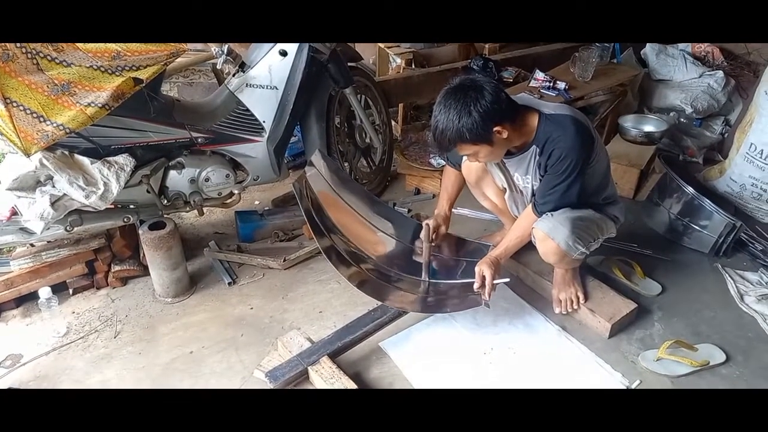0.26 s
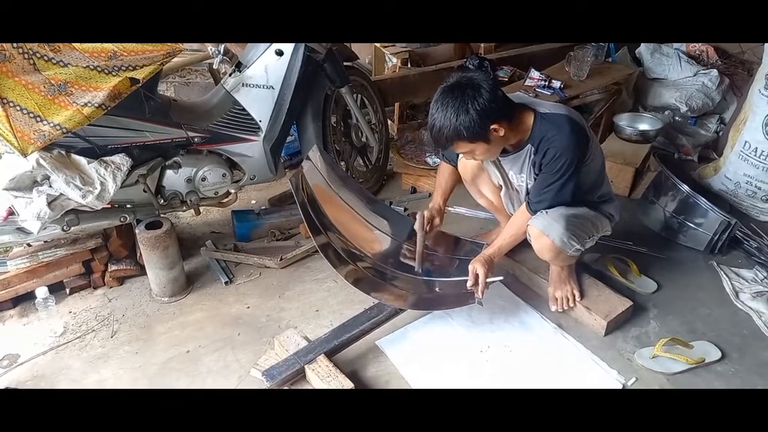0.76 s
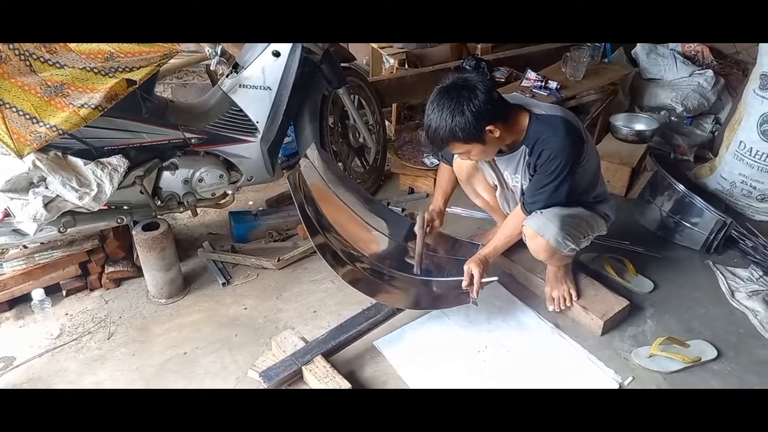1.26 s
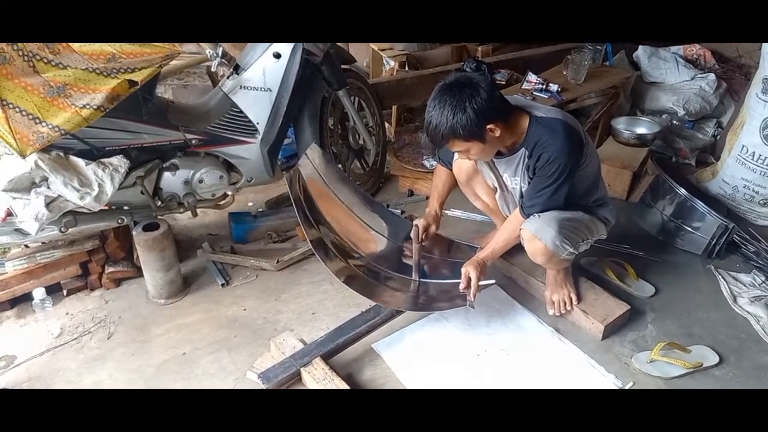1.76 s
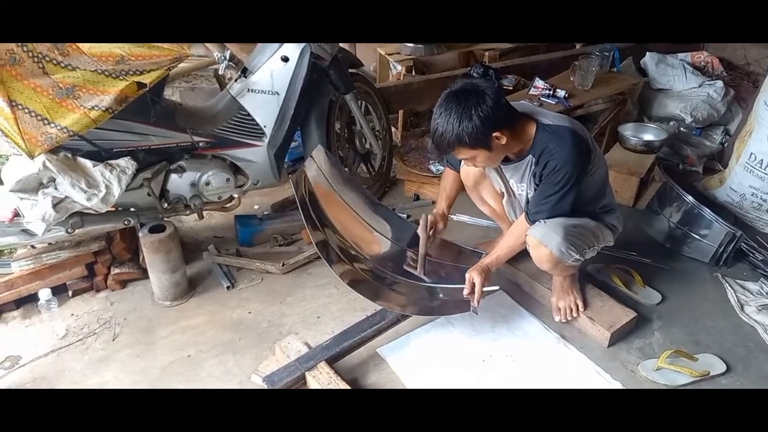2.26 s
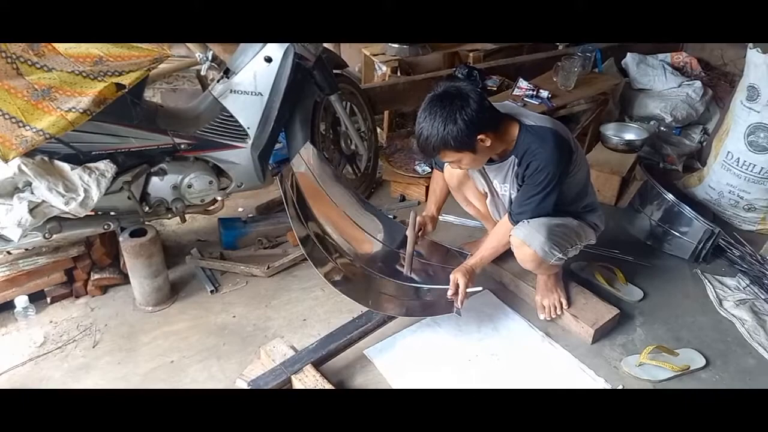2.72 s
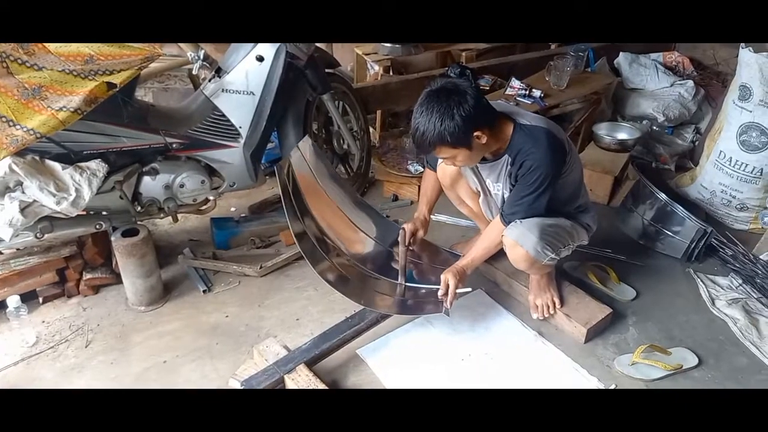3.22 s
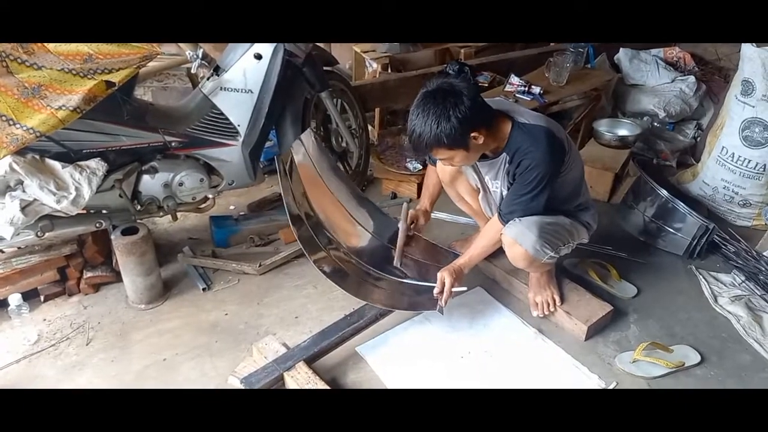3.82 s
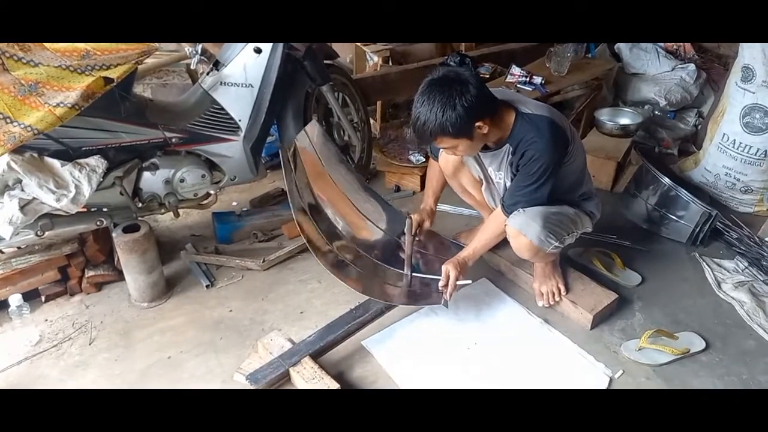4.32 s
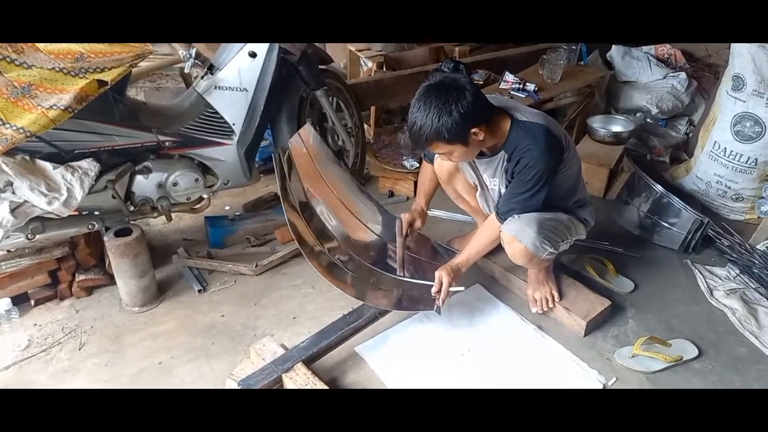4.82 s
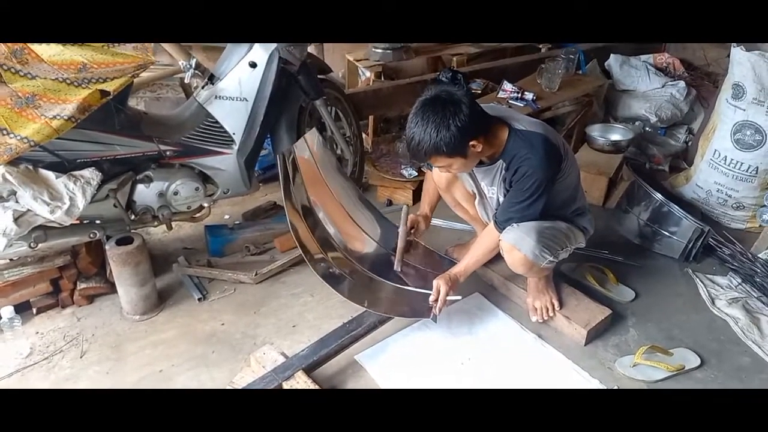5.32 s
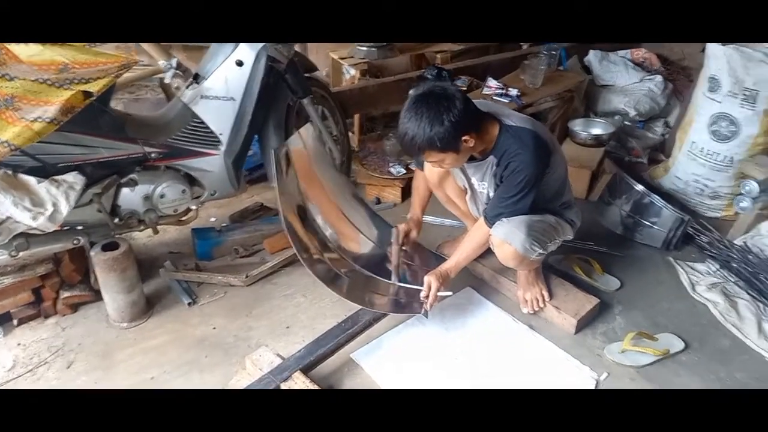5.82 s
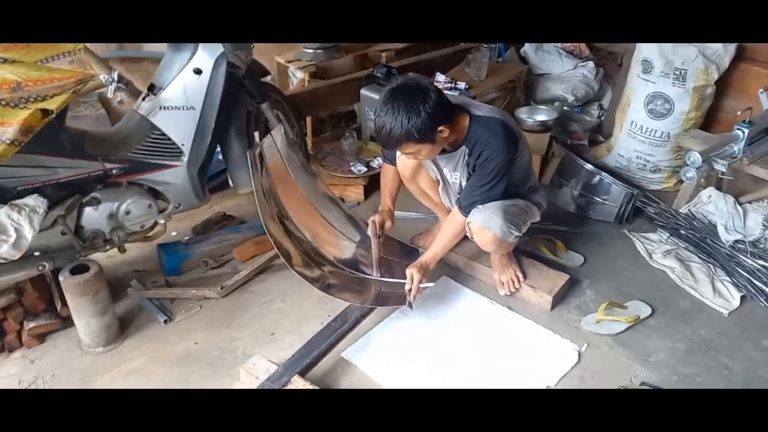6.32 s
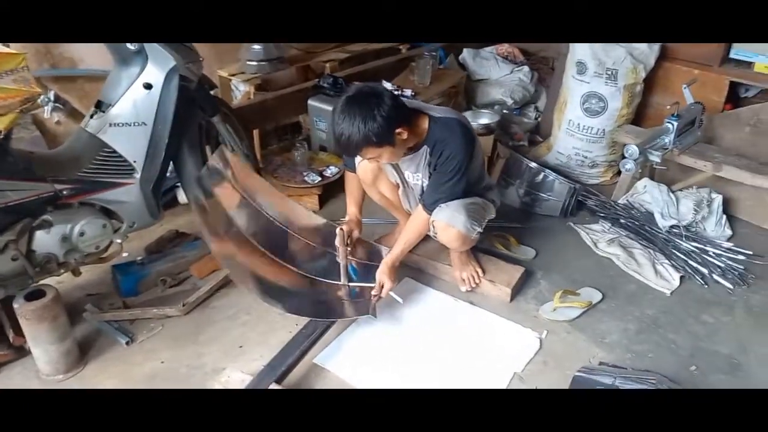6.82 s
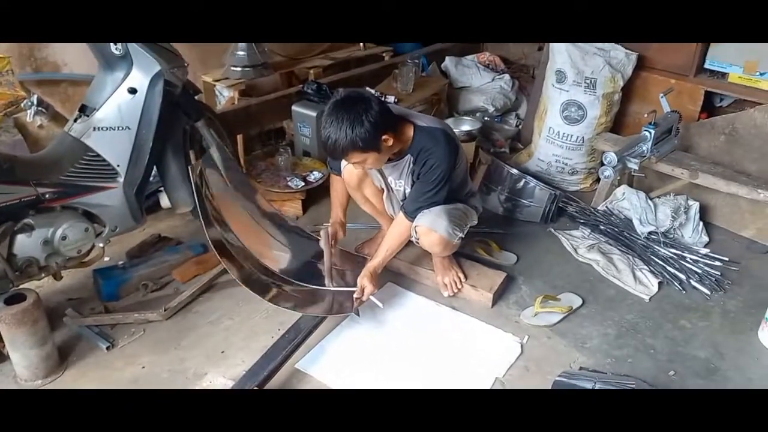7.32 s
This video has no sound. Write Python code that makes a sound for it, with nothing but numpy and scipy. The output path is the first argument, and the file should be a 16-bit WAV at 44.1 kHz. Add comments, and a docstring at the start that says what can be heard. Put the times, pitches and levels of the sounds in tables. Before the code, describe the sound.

Steady close hammering on a metal chisel over a curved steel sheet, each strike a thump and short clang, in a quiet workshop.

```python
"""The scene opens in the ring of a hammer blow: a chisel taps along a curved steel sheet on timber in a workshop.
Steady blows follow; each thumps the low modes, sets a dense clang going and rings chisel and hammer, all dying sines
and shaped noise, and the colour drifts as the chisel walks on. Room tone lies behind; thin whistles, swells of hiss,
a brief hum and a low rumble, made of noise bands and one sine, come and go.
After a pause with light ticks and scrapes, the chisel is set down for one last blow."""
import sys
import numpy as np
from scipy import signal
from scipy.fft import irfft, next_fast_len
from scipy.io import wavfile

SR = 44100
rng = np.random.default_rng(int(sys.argv[2]) if len(sys.argv) > 2 else 0)


def transcribe(signal):
    """Save signal, clipped to [-1, 1], as a 16-bit WAV file at the path in sys.argv[1]."""
    frames = np.atleast_2d(signal).T
    limited = np.clip(frames, -1, 1)
    pcm = np.round(limited * 32767).astype(np.int16)
    wavfile.write(sys.argv[1], SR, pcm)


N = 333837
LENGTH = 32768  # longest single sound, in samples
T = np.arange(LENGTH) / SR
BINS = np.fft.rfftfreq(512, 1 / SR)  # bands of the clang, Hz
AGE = np.arange(LENGTH // 128 + 1) * 128 / SR  # frames of the clang, s after the blow


def amp(db):
    """Decibels to gain."""
    return 10 ** (np.asarray(db) / 20)


def evened(x):
    """Scales to rms 1."""
    return x / np.sqrt(np.mean(x ** 2) + 1e-20)


def read(points, hz):
    """Reads a spectrum table on a log-frequency axis."""
    f, value = np.transpose(points)
    return np.interp(np.log(hz + 1), np.log(f + 1), value)


def add(mix, s, sound):
    """Mixes a stereo sound in at time s, which may lie before the start."""
    at = round(s * SR)
    sound = sound[:, max(-at, 0):]
    part = mix[:, max(at, 0):][:, :sound.shape[1]]
    part += sound[:, :part.shape[1]]


def ears(lean_db):
    """Left and right gains for a level difference."""
    return amp(np.array([lean_db, -lean_db]) / 2)


def decay(age, t60):
    """Exponential fade that has fallen by 60 dB after t60 seconds."""
    return np.exp(-np.log(1000) * age / t60)


def onset(rise):
    """Soft start with the given time constant in seconds."""
    return 1 - np.exp(-T / rise)


def swell(start, rise, hold, t60, db):
    """Gain over the whole scene of a sound that rises, holds and dies away."""
    age = np.arange(N) / SR - start
    attack = np.sin(np.pi / 2 * np.clip(age / rise, 0, 1)) ** 2
    return amp(db) * attack * decay(np.maximum(age - rise - hold, 0), t60)


# how alike the two sides are: f/Hz, left-right correlation [-1 to 1]
LIKENESS = [(50, 0.57), (200, 0.96), (400, 0.82), (750, 0.44), (1400, 0.29), (2600, 0.076), (5000, 0.13),
            (12000, 0)]


def chance(hz, count=1):
    """Random spectra (2, count, bins): alike left and right in the low mids, almost unrelated in the treble."""
    real = rng.standard_normal((2, count, len(hz)))
    a, b = real + 1j * rng.standard_normal((2, count, len(hz)))
    same = np.clip(read(LIKENESS, hz), -1, 1)
    return np.array([a, same * a + np.sqrt(1 - same ** 2) * b])


def noise(tone, size):
    """Steady stereo noise of rms 1 with the given spectrum."""
    hz = np.fft.rfftfreq(size, 1 / SR)
    return evened(irfft(chance(hz)[:, 0] * amp(read(tone, hz)), size))


# spectrum of the still air in the workshop: f/Hz, relative level per Hz/dB
ROOM_TONE = [(20, -23), (50, -5), (100, -2.5), (250, -7), (400, -6.5), (800, -17.5), (1600, -20.5),
             (3000, -22.5), (5000, -32.5), (15000, -35.5)]


def room_tone(level_db=-58.5):
    """Still air in the workshop: steady noise, strongest in the bass."""
    return amp(level_db) * noise(ROOM_TONE, next_fast_len(N))[:, :N]


# one low swell: start t/s, rise/s, hold/s, release t60/s, level/dB
RUMBLE_SWELL = (2, 0.6, 1.5, 4.5, -59)
# its spectrum, peaked in the deep bass: f/Hz, relative level per Hz/dB
RUMBLE_TONE = [(20, -22), (42, -18.5), (49, -4), (57, -17), (80, -20), (160, -21.5), (400, -48.5),
               (2000, -75)]


def rumble():
    """A low drone like a far engine: a narrow hump of bass noise that swells for a while."""
    return swell(*RUMBLE_SWELL) * noise(RUMBLE_TONE, next_fast_len(N))[:, :N]


# swells of hiss, a row each: start t/s, rise/s, hold/s, release t60/s, level/dB
HISS_SWELLS = [(1.15, 0.064, 0.35, 5.5, -54), (4.257, 0.057, 0.054, 0.44, -51),
               (5.352, 0.033, 0.005, 0.2, -50.5)]
# their spectrum: f/Hz, relative level per Hz/dB
HISS_TONE = [(1500, 2.5), (4000, -1), (7000, -9), (8600, -4), (10000, -11.5), (15000, -11.5)]


def hiss():
    """A faint hiss comes and goes: one treble noise under overlapping swells."""
    gain = sum(swell(*row) for row in HISS_SWELLS)
    return gain * noise(HISS_TONE, next_fast_len(N))[:, :N]


# one short swell: start t/s, rise/s, hold/s, release t60/s, level/dB
HUM_SWELL = (1.9, 0.1, 0.2, 0.5, -45)


def hum(pitch_hz=132):
    """A brief low hum: one sine, the same on both sides."""
    return swell(*HUM_SWELL) * np.sin(2 * np.pi * pitch_hz * np.arange(N) / SR)


# thin far whistles, like a small bird: t/s, length/s, f/Hz, level/dB
WHISTLES = [(.5, 0.13, 4300, -75), (2.75, 0.12, 4480, -69), (7.218, 0.14, 4520, -79),
            (7.25, 0.12, 3450, -73)]


def whistles(width_hz=45):
    """Thin notes from outside, blurred by distance: narrow noise bands that fade in and out."""
    out = np.zeros((2, N))
    for s, length, hz, db in WHISTLES:
        size = 2 * round(length * SR / 2)
        line = [(hz - 3 * width_hz, -100), (hz - width_hz, -6), (hz, 0),
                (hz + width_hz, -6), (hz + 3 * width_hz, -100)]
        note = noise(line, LENGTH)[:, :size] * np.sqrt(2 * np.hanning(size))
        add(out, s, amp(db) * note)
    return out


# the chisel touches the sheet lightly: t/s, level/dB, length of the contact as t60/s
TOUCHES = [(6.963, -58, 0.14), (7.028, -56.5, 0.12), (7.406, -47, 0.006), (7.4257, -38, 0.0049),
           (7.4305, -43, 0.008)]
# spectrum of a touch: f/Hz, relative level per Hz/dB
TOUCH_TONE = [(100, -14.5), (400, -29), (2000, -1), (4200, 2), (6000, -10), (15000, -11)]


def touches(echo_db=-21, echo_t60=0.17):
    """Ticks and scrapes as the chisel is lifted and set down: fading noise with a faint tail from the room."""
    out = np.zeros((2, N))
    for s, db, t60 in TOUCHES:
        fade = decay(T, t60) + amp(echo_db) * decay(T, echo_t60)
        add(out, s, amp(db) * noise(TOUCH_TONE, LENGTH) * fade)
    return out


def ring(gains, hz, t60):
    """A sum of dying sines; gains holds a complex size for each side and mode."""
    pole = (2j * np.pi * hz - np.log(1000) / t60)[:, None]
    # coarse steps times fine steps give every sample
    coarse, fine = np.exp(pole * T[::128]), np.exp(pole * T[:128])
    return ((gains[:, None] * coarse.T) @ fine).imag.reshape(2, -1)


def modes(table, colour, hold=1, scatter=0.24, rise=0.003, bend=0.0033):
    """Separate modes with scattered starting phases; the pressure of the hand bends each pitch a little."""
    hz, db, t60, lean_db = np.transpose(table)
    phase, pressure = rng.standard_normal((2, len(hz)))
    gains = ears(lean_db) * amp(db + read(colour, hz)) * np.exp(1j * scatter * phase)
    return ring(gains, hz * (1 + bend * pressure), t60 * hold) * onset(rise)


# the colour drifts with the chisel: f/Hz, level gained from first place to last/dB, extra level midway/dB
WALK = [(160, 4, -2.5), (240, 5.5, -1.5), (400, -1, -0.5), (605, -0.5, 0.5), (847, 3.5, 3.5),
        (1200, 2.5, 0), (2200, 1, 0.5), (3000, 0, -0.5), (7000, 1.5, 0), (13000, 3, -0.5)]


def blow_colour(place, seating_db, hardness_db, knock_hz=428, knock_octaves=0.55, hard_hz=4000):
    """Spectrum of a blow: place tilts it, firm seating knocks around one pitch, hard contact lifts the treble."""
    hz = BINS[1:]
    midway = 1 / 3 - 4 * place ** 2
    walk = read([(f, place * gained_db + midway * extra_db) for f, gained_db, extra_db in WALK], hz)
    knock = np.exp(-.5 * (np.log2(hz / knock_hz) / knock_octaves) ** 2)
    treble = hz ** 4 / (hz ** 4 + hard_hz ** 4)
    return np.transpose([hz, walk + seating_db * knock + hardness_db * treble])


# spectrum of the crowded higher modes: f/Hz, relative level per Hz/dB
CLANG_TONE = [(40, -45.5), (130, -29), (250, -10), (450, 6), (660, -1), (900, 3.5), (1500, 3), (1950, 7.5),
              (2650, 4), (3050, -5.5), (3700, -12.5), (5500, -20.5), (8600, -19.5), (15000, -22)]
# their ring before the seating damps it: f/Hz, nominal t60/s
CLANG_RING = [(60, 0.84), (300, 0.72), (1200, 0.62), (2200, 0.52), (3200, 0.47), (5000, 0.41), (8000, 0.31),
              (15000, 0.32)]
# their balance: f/Hz, left-right level/dB
CLANG_LEAN = [(200, 1.5), (800, -1), (1100, -3.5), (1700, -4), (2600, -6.5), (3500, -3), (6000, -2),
              (8600, 4.5), (11500, -2), (15000, -3.5)]


def clang(field, colour, hold, early_db=3, early_share=0.66, crack_db=5, crack_s=0.0016, rise=0.001):
    """The sheet's crowded modes: a crack, a quick first fall, then a longer ring carried on by the room."""
    fall_db = -60 * AGE[:, None] / (read(CLANG_RING, BINS) * hold)
    fade = np.hypot(amp(fall_db), amp(early_db + fall_db / early_share))
    tone = amp(read(CLANG_TONE, BINS) + read(colour, BINS)) * ears(read(CLANG_LEAN, BINS))[:, None]
    spectra = field * tone * fade
    wave = signal.istft(spectra, nperseg=512, noverlap=384, time_axis=1, freq_axis=2)[1]
    crack = 1 + amp(crack_db) * np.exp(-T / crack_s) / 2
    return wave[:, :LENGTH] * onset(rise) * crack


def shimmer(hz, sizes, colour, hold, rise=.0005, wander=.02):
    """Single high modes stand out of the crowd; the highest shift in pitch with every seating of the chisel."""
    hz = hz * (1 + wander * np.minimum(hz / 5000, 1) ** 3 * rng.standard_normal(len(hz)))
    gains = sizes * amp(read(CLANG_TONE, hz) + read(colour, hz)) * ears(read(CLANG_LEAN, hz))
    return ring(gains, hz, read(CLANG_RING, hz) * hold) * onset(rise)


def push(level_db=-36.5, length_s=0.006):
    """The sheet gives under the blow and pushes the air: one pulse that swings through zero."""
    return amp(level_db) * (1 - T / length_s) * np.exp(-T / length_s)


# a row a blow: t/s, strength/dB, seating of the sheet on the timber/dB, hardness of the contact/dB,
# chisel ring before strength/dB
BLOWS = [(-0.075, -1.5, 0.5, 1, -14.5), (0.295, -0.97, -0.3, 0, -10), (0.661, -0.84, -3.5, 0.5, -8.5),
         (1.029, 0.1, 2, -2, -14), (1.396, 0, 1.3, -1, -16.5), (1.770, 1.2, -1, 1, -18.5),
         (2.142, 0.36, 1, 0, -17), (2.515, 0.96, 2, -0.5, -23), (2.884, 1, -0.8, -4.5, -22),
         (3.258, 0.87, -1.5, -3, -21), (3.638, 0.2, 2, -1, -39), (4.014, 0, 1.5, 0.5, -29),
         (4.384, -1.8, 1, 2, -32), (4.763, -0.1, -2, 2.5, -16.5), (5.139, -0.86, -1, 0, -15.5),
         (5.516, 0.7, 0.4, 0.5, -17.5), (5.893, -0.53, 2.5, 0, -15.5), (6.268, 0, -0.4, -4, -14.5),
         (6.63, 0.5, -4, -4, -15), (7.452, -1.0, -1.5, 3.8, -18.5)]
# the sheet's separate modes: f/Hz, relative level/dB, t60 before the seating damps it/s, left-right level/dB,
# level gained from the first place of the chisel to the last/dB
SHEET_MODES = [(91.8, -20, 0.61, -1, 0.5), (117, -22, 0.56, -2, 3.5), (137.1, -24.5, 0.98, 1, -7.5),
               (157.5, -15.5, 0.56, 0, -11.5), (188, -26.5, 0.86, -8.5, -7), (211.4, -15.5, 0.8, -3, 1),
               (231, -5, 0.61, -2, -5.5), (246.1, 3.5, 0.43, 2, -2), (252.6, -15, 0.91, 3.5, 17.5),
               (266.3, -6, 0.58, -4.5, -6.5), (318.7, -6.5, 0.56, -3.5, -10), (354.6, 3.5, 0.35, -4, -6),
               (367.5, -6, 0.51, -10, -4.5), (385.2, 6.5, 0.2, 0.5, -3.5), (397, -5.5, 0.47, 9.5, -6.5),
               (445, -2.5, 0.42, 3, 8.5), (515, -18.5, 0.84, 4.5, 7), (529.7, -2, 0.22, -0.5, -5),
               (573.6, -7, 0.37, 3.5, -8), (608.6, -3, 0.21, 12.5, 3), (660, -37, 0.44, -4.5, 4.5),
               (724.5, 4.5, 0.094, -2, 2.5), (794, -11, 0.55, 7.5, -7), (826.3, 1, 0.19, 3.5, 2),
               (858, -13.5, 0.82, 0.5, -4), (972, -1, 0.2, 0.5, -1), (1259, -5.5, 0.51, 1.5, -1),
               (1311, -5, 0.52, -11, -6.5)]
# the chisel's own ring: f/Hz, relative level/dB, t60/s, left-right level/dB
CHISEL_MODES = [(1674, 0, .21, -8), (1655, -9, .2, -5)]
# the hammer head's ring: f/Hz, relative level/dB, t60/s, left-right level/dB
HAMMER_MODES = [(2488, 0, .28, -7), (3038, -6, .25, -9)]
# the snap as steel meets steel: f/Hz, relative level/dB, t60/s, left-right level/dB
CONTACT_MODES = [(2755, -0.5, 0.0063, -12), (1970, -11.5, 0.013, -1)]
# towards the treble the crowd of modes thins a little: f/Hz, level/dB
CROWD_THINNING = [(2500, 0), (5000, -.5), (9000, -2.5)]
# and single modes stand out of it: f/Hz, level/dB
STANDOUT = [(1000, -3), (2500, -1), (5000, 2), (8000, 5), (12000, 8)]
# firm timber damps the ring sooner; a hard contact sharpens the snap (dB per dB)
RING_FACTOR, DAMPING_PER_DB, SNAP_PER_DB = 0.91, 0.0277, 0.3
# the sheet drops back on the timber after each blow: level, delay, factor on ring time
SETTLE_DB, SETTLE_S, SETTLE_RING = -21, 0.045, 0.35


def hammering(sheet_db=-22, clang_db=-36.0, shimmer_db=-36.0, hammer_db=-28, contact_db=-6.5,
              step=0.5543, fresh_hz=5000):
    """One sheet answers every blow, but each step of the chisel meets its modes at other points of their shapes."""
    response = chance(BINS, count=len(AGE))
    shape, heading = rng.uniform(0, 2 * np.pi, (2, len(AGE), len(BINS)))
    wavenumber = np.sqrt(BINS / 1000) * np.cos(heading)  # bending waves shorten with the root of frequency
    fresh = BINS ** 2 / (BINS ** 2 + fresh_hz ** 2)  # the treble differs with every contact
    thinning = amp(read(CROWD_THINNING, BINS))

    # single high modes, spaced wider as they rise
    high_hz = np.cumsum(rng.uniform(.2, 1.8, 80) * np.geomspace(70, 330, 80)) + 1000
    high_size, high_shape = chance(high_hz)[:, 0], rng.uniform(0, 2 * np.pi, len(high_hz))
    high_size = high_size / abs(high_size) * amp(read(STANDOUT, high_hz))

    out = np.zeros((2, N))
    for k, (s, strength_db, seating_db, hardness_db, chisel_db) in enumerate(BLOWS):
        place = k / (len(BLOWS) - 1) - .5  # along the chisel's line
        colour = blow_colour(place, seating_db, hardness_db)
        hold = RING_FACTOR * np.exp(-DAMPING_PER_DB * seating_db)

        struck = response * np.sqrt(2) * np.cos(shape + 2 * step * k * wavenumber)
        field = np.sqrt(1 - fresh) * struck + np.sqrt(fresh) * chance(BINS, count=len(AGE))
        blow = amp(clang_db) * clang(field * thinning, colour, hold)

        high_met = high_size * np.cos(high_shape + step * k * np.sqrt(high_hz / 1000))
        blow += amp(shimmer_db) * shimmer(high_hz, high_met, colour, hold)

        low = [(hz, db + place * gained_db, t60, lean_db)
               for hz, db, t60, lean_db, gained_db in SHEET_MODES]
        blow += amp(sheet_db) * modes(low, colour, hold, scatter=1.0, rise=0.0023, bend=0.0072)
        blow += modes(CHISEL_MODES, [(CHISEL_MODES[0][0], chisel_db)])  # one level for all its modes
        blow += amp(hammer_db) * modes(HAMMER_MODES, colour)
        snap_db = contact_db + SNAP_PER_DB * hardness_db
        blow += amp(snap_db) * modes(CONTACT_MODES, colour, scatter=3.16, rise=0.00047)
        blow += push()
        add(out, s, amp(strength_db) * blow)

        settle = modes(low[:5], colour, hold=SETTLE_RING)
        add(out, s + SETTLE_S, amp(strength_db + SETTLE_DB) * settle)
    return out


def scene():
    """The workshop and far sounds, the light touches and the blows."""
    workshop = room_tone() + rumble() + hiss() + hum()
    return workshop + whistles() + touches() + hammering()


def record(dry, low_hz=75, edge_hz=15450):
    """Small microphones lose the deep bass; peaks round off just under full scale; then the band limit."""
    high_pass = signal.butter(2, low_hz, "highpass", fs=SR, output="sos")
    thin = signal.sosfilt(high_pass, dry)
    held = .97 * thin / (1 + thin ** 8) ** (1 / 8)
    band_limit = signal.firwin(255, edge_hz, window=("kaiser", 8), fs=SR)
    return signal.oaconvolve(held, band_limit[None], "same")


dry = scene()
out = record(dry)
transcribe(out)
```